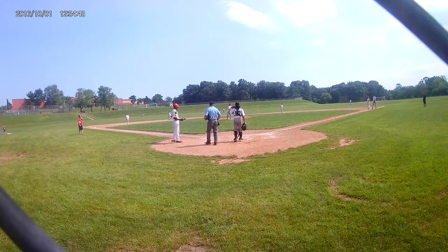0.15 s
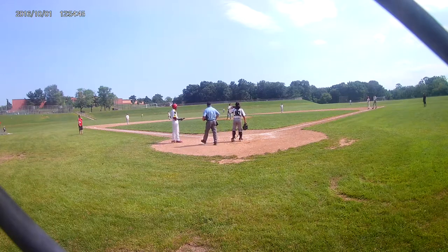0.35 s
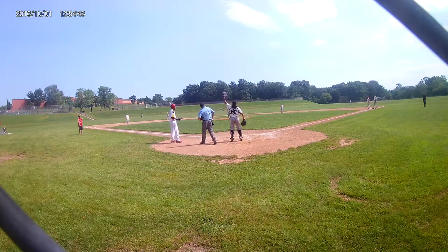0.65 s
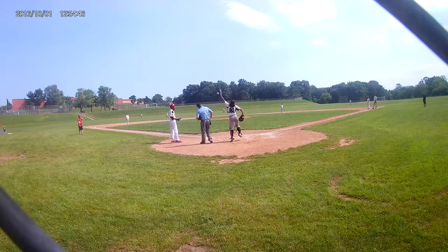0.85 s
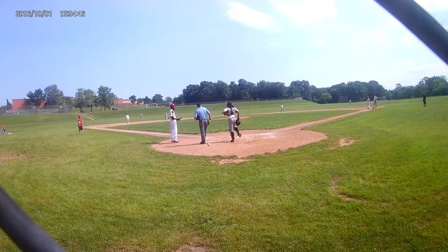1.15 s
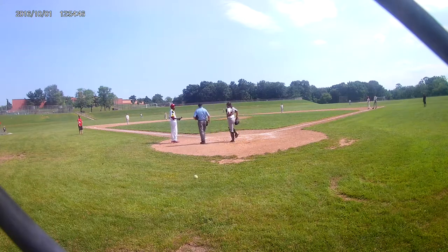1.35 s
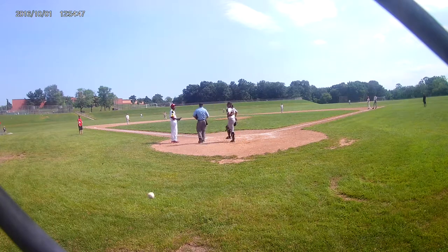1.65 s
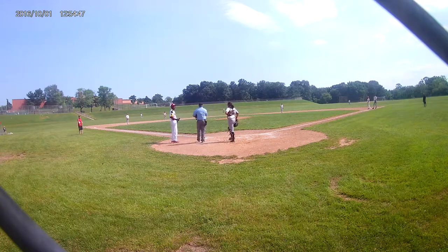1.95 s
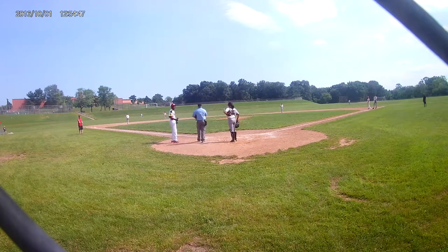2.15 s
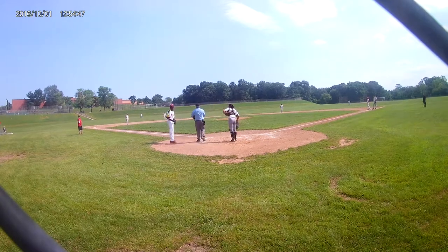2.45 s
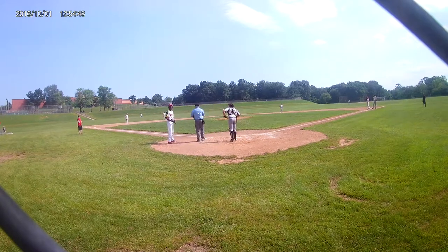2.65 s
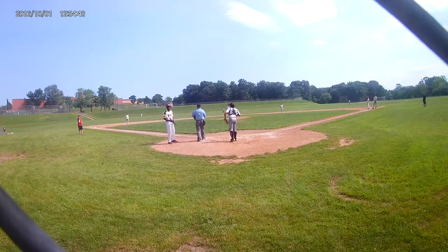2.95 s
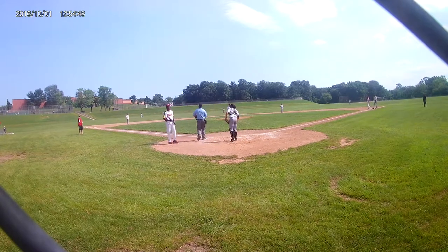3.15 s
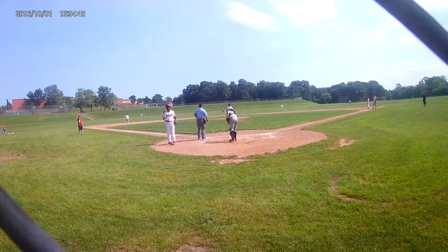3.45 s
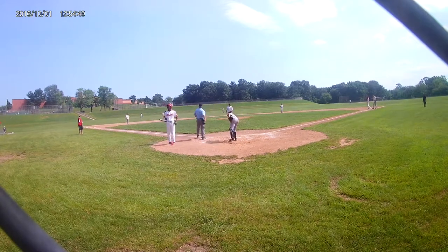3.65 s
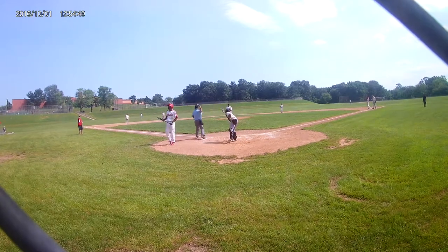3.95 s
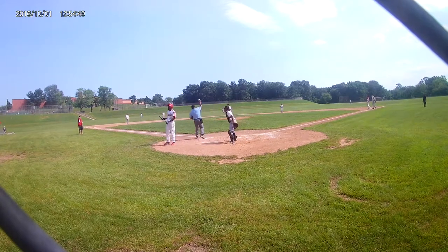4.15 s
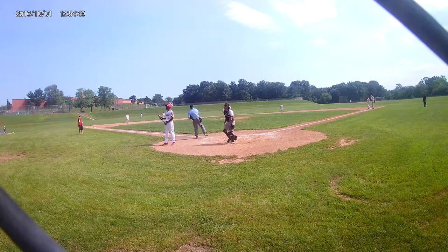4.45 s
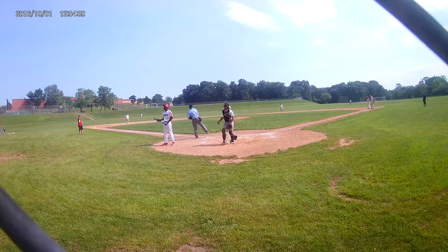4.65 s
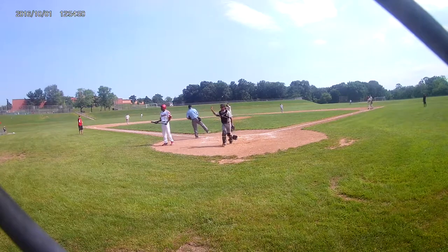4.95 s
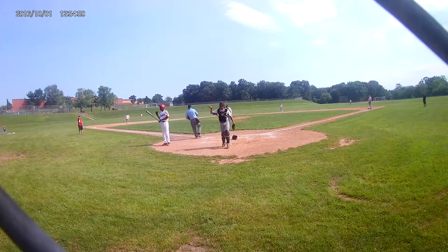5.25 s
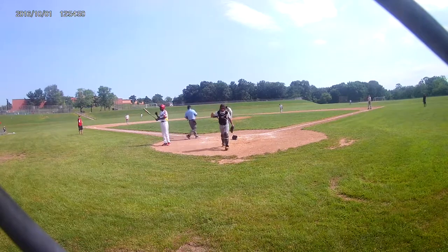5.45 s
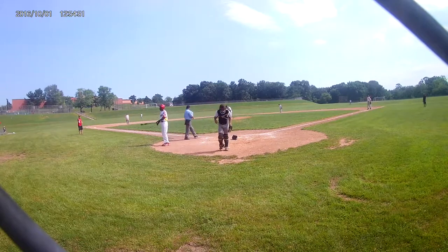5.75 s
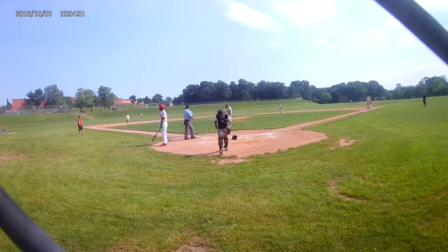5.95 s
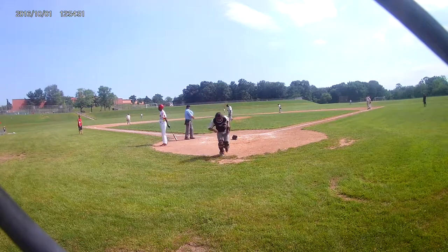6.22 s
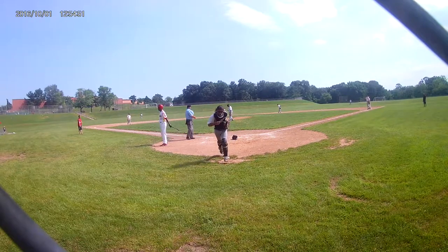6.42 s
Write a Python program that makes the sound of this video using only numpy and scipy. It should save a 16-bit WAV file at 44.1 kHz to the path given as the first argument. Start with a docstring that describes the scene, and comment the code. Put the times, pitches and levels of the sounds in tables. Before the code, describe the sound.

Quiet open field air and a light breeze, then a ball smashes into a chain-link fence at the microphone, ringing and rattling away.

```python
"""Faint air over an open field, then a light breeze; a ball slams into a chain-link fence, just after a short
faint noise. The microphone rides on the fence and hears it through its own steel; the crash overloads it.
The mesh rings on in bands of dense wire modes and the panel shudders, both made from shaped noise or random
tones that fade with time; loose links rattle, rub and tick in random bursts of filtered contacts."""
import sys
import numpy as np
from scipy import signal
from scipy.fft import rfft, irfft, next_fast_len
from scipy.io import wavfile
from scipy.ndimage import uniform_filter1d, map_coordinates

SR = 44100
rng = np.random.default_rng(int(sys.argv[2]) if len(sys.argv) > 2 else 0)


def digitize_waveform(pressure):
    """Quantize a signal to 16-bit integers and store it at the path in sys.argv[1].

    Rows of a 2-D input are taken as channels; values are limited to [-1, 1].
    """
    field = np.atleast_2d(pressure).T
    bounded = np.clip(field, -1, 1)
    quanta = np.round(bounded * 32767).astype(np.int16)
    wavfile.write(sys.argv[1], SR, quanta)


N = 290398
HIT_S = 2.1215  # the ball meets the mesh (s)


def amp(db):
    """Decibels to gain."""
    return 10 ** (np.asarray(db) / 20)


def unit(x):
    """Scale x to an average strength (rms) of 1."""
    return x / np.sqrt(np.mean(x ** 2) + 1e-20)


def clock():
    """The time of every sample, in seconds."""
    return np.arange(N) / SR


def curve(rows):
    """Join (seconds, value) rows by straight lines."""
    return np.interp(clock(), *np.transpose(rows))


def wobble(rate):
    """A smooth random curve through rate random points a second."""
    return map_coordinates(rng.standard_normal(256), [clock() * rate], mode="wrap")


def swells(rows):
    """Summed gain of bell-shaped swells: (seconds, half length in seconds, dB)."""
    t = clock()
    return sum(amp(db) * np.exp(-.5 * ((t - s) / length) ** 2) for s, length, db in rows)


def since_hit(rise):
    """Seconds since the blow, and a gain that swells from 0 towards 1 after it."""
    age = np.maximum(clock() - HIT_S, 0)
    return age, 1 - np.exp(-age / rise)


def settling(age, hold, fall_db):
    """Level in dB of a motion that holds briefly, then fades by fall_db per tenfold time."""
    return -fall_db * np.log10(1 + age / hold)


def filtered(x, response):
    """Multiply the spectrum of x by a response to frequency."""
    size = next_fast_len(len(x) + 8192, real=True)  # spare room for the filter's tail
    spectrum = rfft(x, size) * response(np.fft.rfftfreq(size, 1 / SR))
    return irfft(spectrum, size)[:len(x)]


def coloured(x, points):
    """Shape x by a (Hz, dB) spectrum, then bring it to rms 1."""
    f, db = np.transpose(points)
    return unit(filtered(x, lambda hz: amp(np.interp(np.log(hz + 1), np.log(f), db))))


def contacts(rate, scatter_db):
    """Random impulses of uneven size and either sign, about rate a second."""
    struck = rng.random(N) < rate / SR
    return struck * rng.choice([-1, 1], N) * amp(scatter_db * rng.standard_normal(N))


def wire_modes(spacing_hz, thin_hz, scatter_db):
    """Frequency grid and a random comb of wire modes on it, thinning out towards the treble."""
    hz = np.fft.rfftfreq(2 * next_fast_len(N // 2 + 1, real=True), 1 / SR)
    is_mode = rng.random(len(hz)) < hz[1] / (spacing_hz * (1 + (hz / thin_hz) ** 2))
    size = amp(scatter_db * rng.standard_normal(len(hz)))
    phase = np.exp(2j * np.pi * rng.random(len(hz)))
    return hz, is_mode * size * phase


# The tone of the open air. Each row: frequency in Hz, relative level in dB per Hz.
AIR_TONE = [(10, -21), (25, -6), (85, -3), (200, -6), (450, -12), (1000, -17.5), (2700, -25.5), (6000, -31),
            (10000, -32), (14500, -31.5)]
# A breeze gets up: start (s), rise (s), level of the lull before it (dB below the breeze)
BREEZE_S, BREEZE_RISE_S, LULL_DB = 1.3, 0.11, -12.5
GUST_DB, GUSTS_PER_S = 2, 7  # typical swing of the gusts (dB), random points a second


def field(air_db, breeze_db):
    """Steady outdoor air is shaped noise; a light breeze rumbles at the microphone in uneven gusts."""
    rumble_tone = [(25, -22.5), (60, -3.5), (90, 4.0), (140, -8.5), (1500, -91)]  # (Hz, relative dB)
    rumble = coloured(rng.standard_normal(N), rumble_tone)
    rise_db = curve([(BREEZE_S, LULL_DB), (BREEZE_S + BREEZE_RISE_S, 0)])
    gusts_db = rise_db + GUST_DB * wobble(GUSTS_PER_S)
    air = amp(air_db) * coloured(rng.standard_normal(N), AIR_TONE)
    return air + amp(breeze_db + gusts_db) * rumble


# A bright tone, shared by this noise and the clinks and ticks of the links below.
# Each row: frequency in Hz, relative level in dB per Hz.
LINK_TONE = [(300, -30), (1200, -8), (2500, -1), (3500, 1), (4600, 0), (5700, -1), (6200, -12), (8000, -19),
             (15000, -26)]
LEAD_IN_S = 2.095  # the faint noise starts (s)


def lead_in(level_db, rise):
    """A faint bright noise of dense random impulses starts 26 ms before the blow and stops at it."""
    t = clock()
    gain = (1 - np.exp(-np.maximum(t - LEAD_IN_S, 0) / rise)) * (t < HIT_S)
    return amp(level_db) * gain * coloured(contacts(rate=9800, scatter_db=2), LINK_TONE)


# The tone of the crash. Each row: frequency in Hz, relative level in dB per Hz.
CRASH_TONE = [(20, -51.5), (60, -23), (200, -16), (300, 13.5), (450, -8), (900, -3), (1450, 4.5),
              (2300, -25), (4300, -12.5), (6500, -34), (15000, -45)]
# The ball drives into one strand after another. Each row: time in seconds, relative level in dB.
STRAND_SNAPS = [(2.124, -4), (2.133, -6), (2.138, -2), (2.151, -6), (2.1642, -4.5)]


def crash(level_db, t60, onset_db, onset_s):
    """A softer burst swells around the blow, then each strand hit snaps taut with a clash of links."""
    t = clock()
    force = amp(onset_db) * np.exp(-((t - HIT_S) / onset_s) ** 2)
    for s, db in STRAND_SNAPS:
        snap = (t > s) * amp(db - 60 * np.abs(t - s) / t60)
        force = np.hypot(force, snap)
    return amp(level_db) * force * coloured(contacts(rate=6500, scatter_db=3.5), CRASH_TONE)


def thud(level_db, pitch_hz, t60):
    """The ball's push makes the frame boom briefly, as one fading tone."""
    age, swell = since_hit(rise=0.028)
    return amp(level_db - 60 * age / t60) * swell * np.sin(2 * np.pi * pitch_hz * age)


# A periodic mesh rings only in certain bands. Each row: centre in Hz, width in Hz, relative level in dB,
# hold in seconds, fall in dB per tenfold time.
MESH_BANDS = [(146, 141, -17, 0.18, 33), (322, 124, -14, 0.12, 31.5), (508, 258, -15, 0.17, 34),
              (740, 95, -12, 0.15, 39.5), (884, 120, -20.5, 0.17, 37.5), (1028, 201, -13, 0.11, 28.5),
              (1310, 203, -9.5, 0.085, 28.5), (1517, 210, -7, 0.096, 32.5), (1666, 160, -18.5, 0.11, 34),
              (1977, 230, -17.5, 0.093, 32), (2422, 790, -22.5, 0.12, 35.5),
              (3392, 350, -18.5, 0.078, 36.5), (3840, 300, -23.5, 0.092, 38.5), (4410, 700, -22, 0.091, 39)]


def mesh(edge):
    """Many wire modes ring; the lossy ones die first, so each band fades as a power of time."""
    hz, modes = wire_modes(spacing_hz=1.6, thin_hz=1214, scatter_db=0)
    age, swell = since_hit(rise=0.015)
    out = np.zeros(N)
    for centre, width, db, hold, fall_db in MESH_BANDS:
        passband = 1 / (1 + np.abs(2 * (hz - centre) / width) ** edge)
        ringing = unit(irfft(modes * passband)[:N])
        out += ringing * amp(db + settling(age, hold, fall_db))
    return wandering(out) * swell


def wandering(x):
    """Coupled wires pass their energy to and fro, so the high partials swell and sink in turn."""
    hz, _, z = signal.stft(x, SR, nperseg=1024)
    drift = uniform_filter1d(rng.standard_normal(z.shape), size=2, axis=0)  # smooth over frequency
    drift = unit(uniform_filter1d(drift, size=9, axis=1))  # smooth over time
    depth_db = np.interp(hz, [1500, 3200], [0, 3.5])[:, None]
    return signal.istft(z * amp(depth_db * (drift - .3)), SR, nperseg=1024)[1][:N]


# The strands nearest the blow. Each row: pitch in Hz, relative level in dB, seconds to fade by 60 dB.
NEAR_STRANDS = [(164.2, -2.5, 2), (311, -2, 0.6), (426, -16, 4.3), (541, -4.5, 1), (739, -4.5, 1.1),
                (981, -6, 1.5), (1200, -7, 1.9), (1310, 7.5, 0.54), (1485, -3, 1.9), (1530, -2.5, 1.3),
                (1620, -10, 1), (1918, -14, .9), (2990, -14, .4), (3304, -9, 0.66), (3900, -29.5, 0.89)]


def strands(level_db):
    """The struck wires sing out with the mesh; each swings in two planes, so its note beats."""
    age, swell = since_hit(rise=0.00572)
    start = round(HIT_S * SR)
    t, out = age[start:], np.zeros(N)
    for hz, db, t60 in NEAR_STRANDS:
        split_hz = rng.uniform(2, 6)
        beat = np.cos(2 * np.pi * split_hz * t)
        note = np.sin(2 * np.pi * (hz * t + rng.random()))
        out[start:] += amp(db - 60 * t / t60) * beat * note
    return amp(level_db) * swell * out


# The tone of the shuddering panel. Each row: frequency in Hz, relative level in dB per Hz.
PANEL_TONE = [(20, -44.5), (42, -23), (60, -9), (75, 2.5), (90, -4.5), (115, -13), (170, -21.5),
              (600, -120)]
# The slowest waves of the panel. Each row: frequency in Hz, relative level in dB per Hz.
SLACK_TONE = [(8, -52), (20, -11), (32, 5), (50, -3), (80, -41), (300, -120)]
# Big waves that run back along the fence. Each row: time in seconds, half length in seconds,
# relative level in dB.
RETURNING_WAVES = [(2.45, 0.029, -18), (2.55, 0.061, -21), (2.88, 0.031, -23.5), (3.96, 0.06, -33.5),
                   (4.33, 0.031, -35.5), (5.54, 0.075, -41), (5.83, .04, -42)]
SWAY_DB, SWAY_HOLD_S, SWAY_FALL_DB = -19.5, 0.52, 30.5  # relative level, hold, fall per tenfold time
SWAY_FLUTTER_DB, SWAY_FLUTTERS_PER_S = 2.5, 8  # typical swing (dB), random points a second


def shudder(level_db, evenness, slack_db, slack_fall_db):
    """Slow waves run to and fro across the panel and shake the microphone each time they pass."""
    wave = signal.hilbert(coloured(rng.standard_normal(N), PANEL_TONE))
    strength = np.sqrt(np.abs(uniform_filter1d(np.abs(wave) ** 2, size=SR // 16)))
    steadier = unit(wave.real / strength ** evenness)  # partly evens out the noise's own swells
    age, swell = since_hit(rise=0.027)
    flutter_db = SWAY_FLUTTER_DB * wobble(SWAY_FLUTTERS_PER_S)
    fading = amp(SWAY_DB + settling(age, SWAY_HOLD_S, SWAY_FALL_DB) + flutter_db)
    passing = amp(level_db) * np.hypot(fading, swells(RETURNING_WAVES)) * steadier
    slack = amp(slack_db - slack_fall_db * age) * coloured(rng.standard_normal(N), SLACK_TONE)
    return swell * (passing + slack)


def fretting(sizzle_db, clink_db, hold, fall_db):
    """Wire rubs on wire while the mesh moves: a fine sizzle of noise and many tiny clinks."""
    age, swell = since_hit(rise=.01)
    sizzle = rng.standard_normal(N)
    t = clock()[:SR // 50]
    scrape = rng.standard_normal(len(t)) * amp(-60 * t / 0.0076)
    knocks = contacts(rate=90, scatter_db=2)
    clinks = coloured(signal.fftconvolve(knocks, scrape)[:N], LINK_TONE)
    rubbing = amp(sizzle_db) * sizzle + amp(clink_db) * clinks
    return swell * amp(settling(age, hold, fall_db)) * rubbing


# The strongest flurries of loose links. Each row: time in seconds, half length in seconds,
# relative level in dB.
LINK_FLURRIES = [(2.27, 0.033, -36.5), (2.498, 0.037, -40.5), (2.917, 0.043, -50), (3.58, 0.04, -53.5),
                 (4.165, .016, -49)]
# The tone of the buzzing links. Each row: frequency in Hz, relative level in dB per Hz.
BUZZ_TONE = [(600, -30), (1500, -2), (2900, -7), (3350, 3.5), (3650, -2), (3950, 5), (4700, -4),
             (5000, -27.5), (6900, -14.5), (8000, -29.5), (15000, -28.5)]
# Lesser flurries come and go as the mesh settles: relative level and fall, then typical swing and
# random points a second
FLURRY_DB, FLURRY_FALL_DB_PER_S = -43.5, 11
FLURRY_SWING_DB, FLURRIES_PER_S = 2.6, 14


def chatter(level_db, t60, ring_db):
    """Flurries of small contacts, each of which sets the thin wires ringing."""
    t = clock()[:SR // 4]
    age, swell = since_hit(rise=.05)
    swing_db = FLURRY_SWING_DB * wobble(FLURRIES_PER_S)
    lesser = swell * amp(FLURRY_DB - FLURRY_FALL_DB_PER_S * age + swing_db)
    flurry = np.hypot(swells(LINK_FLURRIES), lesser)
    modes = wire_modes(spacing_hz=7, thin_hz=3000, scatter_db=2)[1]
    wire = irfft(modes)[:SR // 4] * amp(-60 * t / t60)
    knocks = flurry * unit(contacts(rate=900, scatter_db=3))
    ring = signal.fftconvolve(knocks, wire / np.linalg.norm(wire))[:N]
    rung = knocks + amp(ring_db) * ring
    return amp(level_db) * np.std(knocks) * coloured(rung, BUZZ_TONE)


# The loudest single links knocking together. Each row: time in seconds, relative peak in dB.
LOUD_TICKS = [(2.2657, -38), (2.3563, -37.5), (2.4184, -38), (2.5454, -41), (2.57, -39.5), (2.6813, -47),
              (2.8825, -47), (3.0404, -46), (3.1767, -51), (3.3707, -58), (4.0032, -53), (4.1128, -50.5),
              (4.8234, -61), (4.9113, -55.5), (5.7323, -59)]
SMALL_TICKS_PER_S, SMALL_TICK_SCATTER_DB = 7, 2
# Lesser knocks: relative first peak (dB), hold (s), fall per tenfold time (dB)
SMALL_TICK_DB, SMALL_TICK_HOLD_S, SMALL_TICK_FALL_DB = -42.5, .35, 26.5


def ticks(level_db, t60):
    """Two links knock in a brief bright click; lesser ones fall at random, weaker as the fence settles."""
    out, t = np.zeros(N + SR), np.arange(SR // 20) / SR
    span = N / SR - HIT_S
    ages = rng.uniform(0, span, round(SMALL_TICKS_PER_S * span))
    peaks = SMALL_TICK_DB + settling(ages, SMALL_TICK_HOLD_S, SMALL_TICK_FALL_DB)
    peaks += rng.normal(0, SMALL_TICK_SCATTER_DB, len(ages))
    for s, db in [*LOUD_TICKS, *zip(HIT_S + ages, peaks)]:
        burst = coloured(rng.standard_normal(len(t)), LINK_TONE) * amp(-60 * t / t60)
        out[round(s * SR):][:len(t)] += amp(db + level_db) * burst / np.max(np.abs(burst))
    return out[:N]


def scene():
    """The field and the fence, in one channel."""
    air = field(air_db=-64.5, breeze_db=-66.5)
    faint_noise = lead_in(level_db=-35.5, rise=0.008)
    blow = crash(level_db=-1.5, t60=0.072, onset_db=-16.5, onset_s=0.006)
    blow += thud(level_db=6.0, pitch_hz=301.0, t60=0.098)
    ring = mesh(edge=3.08) + strands(level_db=-13)
    sway = shudder(level_db=0.5, evenness=0.604, slack_db=-45, slack_fall_db=3.5)
    rattle = fretting(sizzle_db=-39, clink_db=-40, hold=.15, fall_db=32)
    rattle += chatter(level_db=-2.0, t60=0.094, ring_db=1)
    clicks = ticks(level_db=7, t60=.015)
    return (air + faint_noise + blow + ring + sway + rattle + clicks)[None]


TOP_HZ = 15300  # band limit


def record(dry, ceiling=0.95):
    """The crash clips the input; nothing is kept above the band limit."""
    clipped = np.clip(dry[0], -ceiling, ceiling)
    return filtered(clipped, lambda hz: hz < TOP_HZ)[None]


dry = scene()
out = record(dry)
digitize_waveform(out)
```